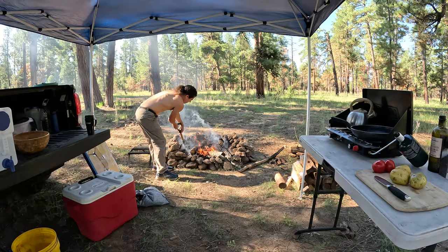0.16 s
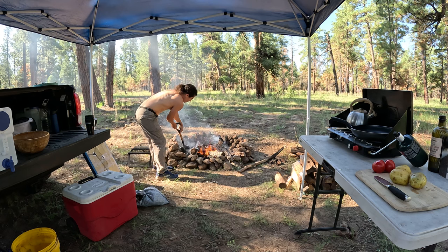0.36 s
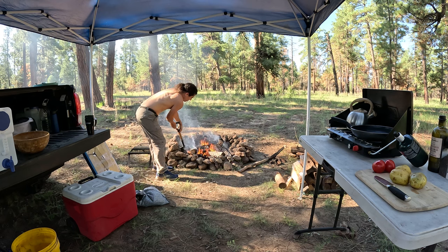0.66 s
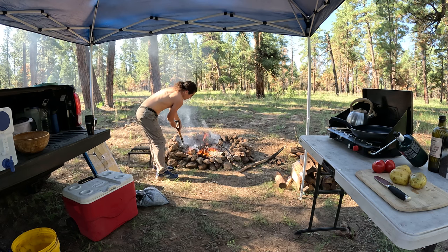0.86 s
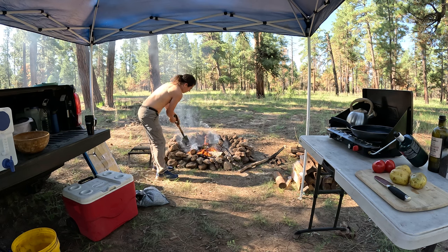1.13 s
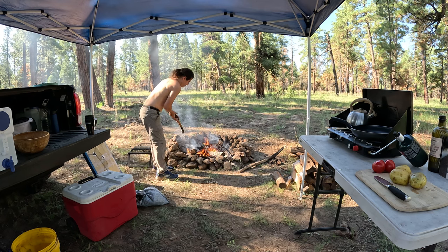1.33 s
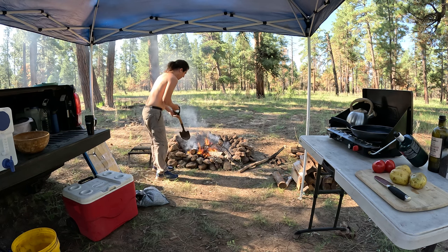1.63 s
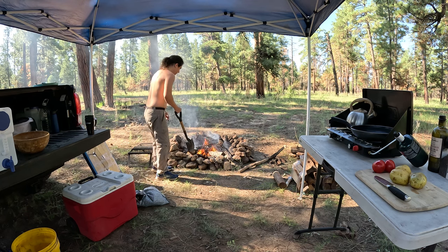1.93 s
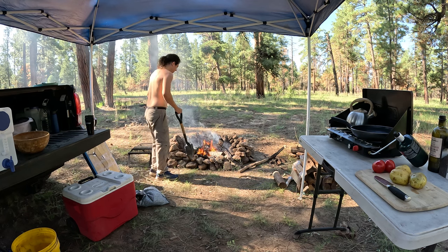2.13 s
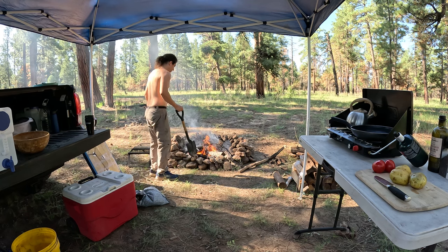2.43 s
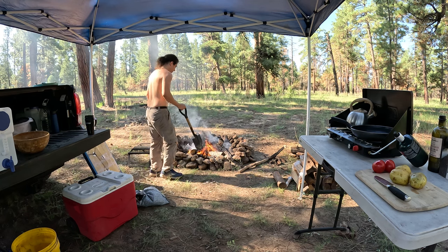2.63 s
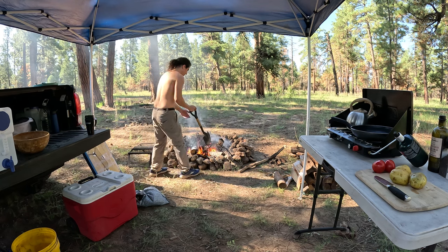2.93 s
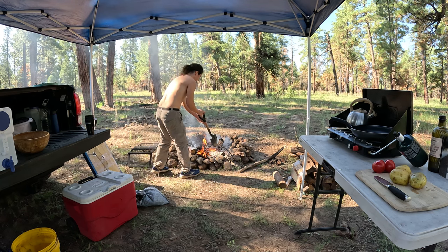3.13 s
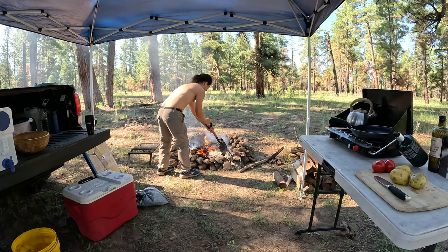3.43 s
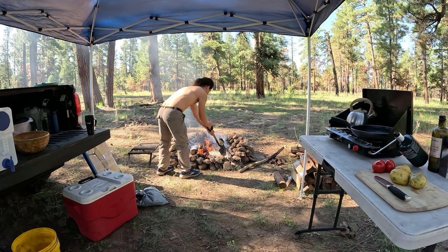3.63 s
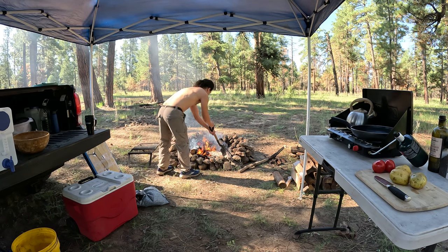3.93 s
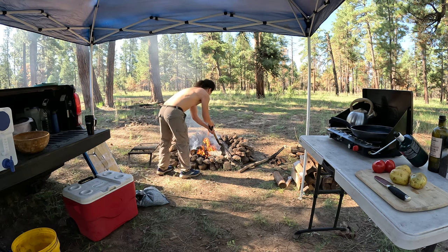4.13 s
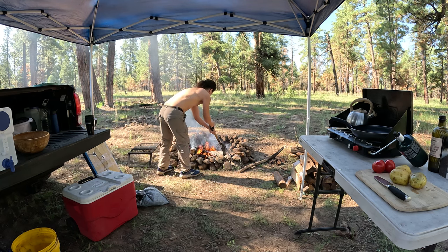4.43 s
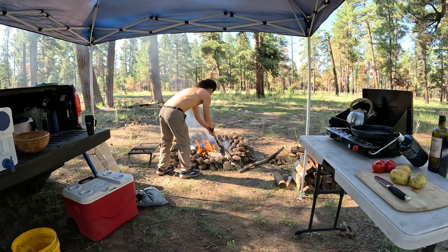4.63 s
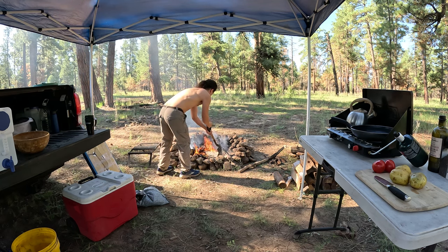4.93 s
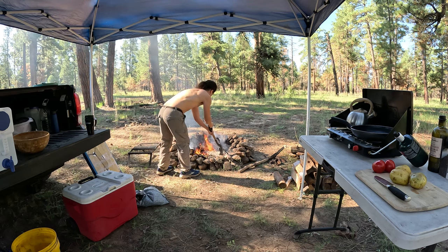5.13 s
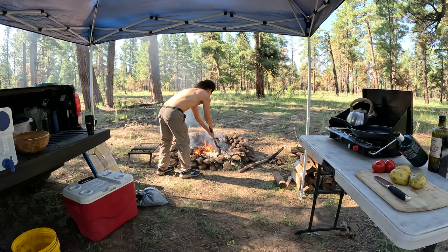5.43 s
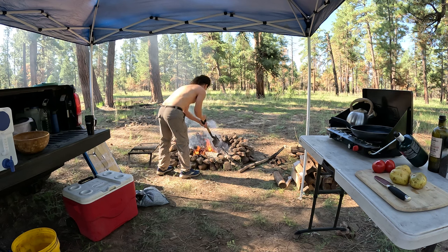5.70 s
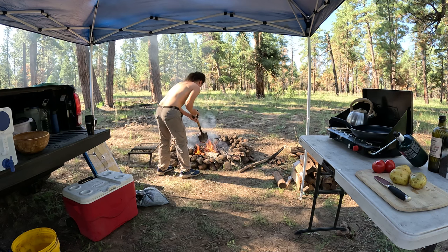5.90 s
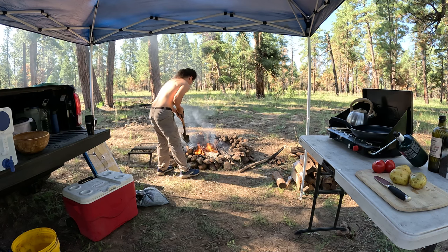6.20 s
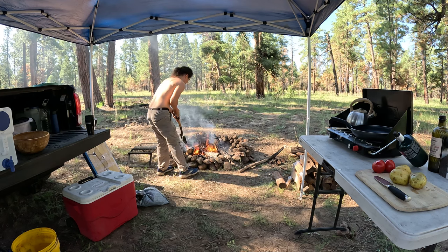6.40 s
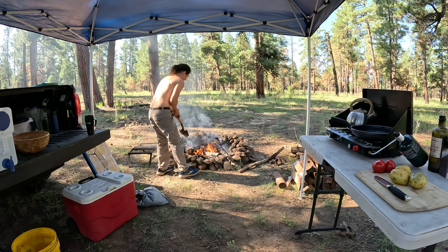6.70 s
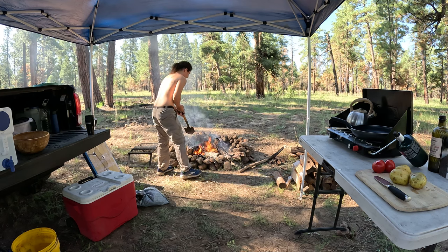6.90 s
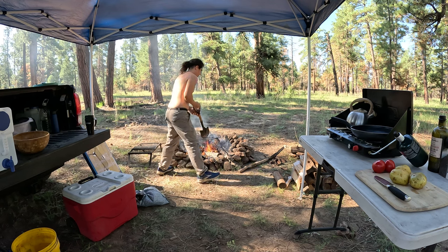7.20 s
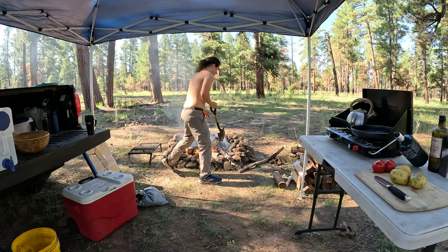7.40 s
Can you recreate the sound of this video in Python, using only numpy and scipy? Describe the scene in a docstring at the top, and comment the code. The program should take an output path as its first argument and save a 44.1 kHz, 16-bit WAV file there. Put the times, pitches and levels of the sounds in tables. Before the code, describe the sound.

A steel shovel works a wood fire outdoors. It opens with small ringing taps and a loud crunchy jab into coals, then the fire pops alone, one snap very sharp. Lighter knocks follow, then clanks, gritty scraping and a hard crunching strike, before crackles take over and a faint scrape ends it. Camera a few metres away under a canopy, quick echoes, soft forest hush.

```python
"""A wood fire pops and ticks near a small camera under a fabric canopy: each pop is an impulsive front with
a splintering tail, followed some 3 ms later by a strong echo. A steel shovel knocks, scrapes and rakes through
the coals: grains of noise make the crunch and decaying modes ring the blade, its early echoes far weaker.
A diffuse tail from the trees follows both, over fluttering flames and the hush of the forest, which are
noise shaped in frequency and time."""
import sys
import numpy as np
from scipy import signal
from scipy.io import wavfile
from scipy.ndimage import uniform_filter1d

SR = 44100
rng = np.random.default_rng(int(sys.argv[2]) if len(sys.argv) > 2 else 0)


def voltage_ratio(level):
    """Linear amplitude factor for a level in decibels (scalar or array-like)."""
    return 10 ** (np.asarray(level, float) / 20)


def put_to_file(sound):
    """Save the sound as 16-bit audio at rate SR, in the file named by the first command-line argument."""
    columns = np.atleast_2d(sound).T  # one column per channel
    safe = np.clip(columns, -1, 1)
    whole_steps = np.round(safe * 32767)
    wavfile.write(sys.argv[1], SR, whole_steps.astype(np.int16))


N = 332955  # length in samples


def evened(x):
    """Normalisation: scales a signal to rms 1."""
    return x / np.sqrt(np.mean(x ** 2) + 1e-20)


def read(points, hz):
    """Interpolation of a spectrum on a logarithmic frequency axis."""
    f, value = np.transpose(points)
    return np.interp(np.log(hz + 1), np.log(f + 1), value)


def add(mix, s, sound):
    """Superposition: adds a sound to the mix, in place, at s seconds."""
    part = mix[max(round(s * SR), 0):][:len(sound)]
    part += sound[:len(part)]


def colour(points, hz=None, octaves=1., reach_db=60, size=2048):
    """Minimum-phase response of a spectrum, optionally weighted towards a centre frequency."""
    f = np.fft.rfftfreq(size, 1 / SR)
    db = read(points, f)
    if hz:
        distance = np.log2((f + 1) / hz) / octaves  # the weighting is 6 dB down at distance 1
        db = db - np.minimum(6 * distance ** 2, reach_db)
    log_gain = np.log(voltage_ratio(np.maximum(db - db.max(), -80)))
    full = np.concatenate([log_gain, log_gain[-2:0:-1]])
    phase = -signal.hilbert(full).imag  # the phase that makes the response causal
    return np.fft.ifft(np.exp(full + 1j * phase)).real[:size // 2]


def slow(t, low_hz, high_hz):
    """Slow random modulation of rms 1: a sum of sines with random phases."""
    waves = [np.sin(2 * np.pi * (f * t + rng.random())) / np.sqrt(f)
             for f in np.geomspace(low_hz, high_hz, num=24)]
    return evened(sum(waves))


def clicks(per_s, spread_db):
    """Random impulse process: sparse clicks of random sign, a few of them large."""
    size = voltage_ratio(spread_db * np.minimum(rng.exponential(1, N), 5)) * rng.choice([-1., 1.], N)
    return size * (rng.random(N) < per_s / SR)


# spectrum of forest air and flames: f/Hz, relative level/dB
HUSH_SPECTRUM = [(18, -48), (30, -19.5), (86, -15.5), (181, -1.5), (470, -2), (562, 2), (941, -4.5),
                 (1190, -0.5), (2700, -4.5), (5690, -14.5), (7170, -18.5), (9040, -33.5), (10800, -23),
                 (12600, -34), (14000, -66)]


def hush():
    """Filtered noise: forest air and flames drift in patches, the bass fluttering in lumps."""
    frames, hz = N // 256 + 5, np.fft.rfftfreq(1024, 1 / SR)
    real, imaginary, patches = rng.standard_normal((frames, 513, 3)).T
    patches = uniform_filter1d(patches, size=10, axis=0)  # joined across frequency
    patches = evened(uniform_filter1d(patches, size=12, axis=1))  # and across time
    t = np.arange(frames) * 256 / SR
    flutter_db = 8 * np.tanh(.6 * slow(t, 4, 40)) / (1 + (hz[:, None] / 300) ** 2)
    drift_db = 2.0 * patches + 0.1 * slow(t, 0.31, 10.0)
    z = (real + 1j * imaginary) * voltage_ratio(read(HUSH_SPECTRUM, hz)[:, None] + drift_db + flutter_db)
    noise = signal.istft(z, nperseg=1024, noverlap=768)[1][:N]
    return voltage_ratio(-58) * evened(noise)


# decay of the tail scattered by the trees: f/Hz, t60/s
TREE_DECAY = [(200, 0.32), (1500, 0.19), (4000, 0.16), (10000, 0.12)]


def trees(x):
    """Diffuse scattering: sparse taps of random sign, each band dying at its own speed."""
    taps = np.zeros(SR // 2)
    at = np.arange(200, SR // 2 - 20, 20)
    taps[at + rng.integers(0, 20, len(at))] = rng.choice([-1., 1.], len(at))
    hz, t, z = signal.stft(taps, SR, nperseg=256)
    decay = voltage_ratio(-60 * t / read(TREE_DECAY, hz)[:, None])
    tail = signal.istft(z * decay, SR, nperseg=256)[1]
    return signal.oaconvolve(x, tail / np.linalg.norm(tail))[:N]


# early reflections: delay t/ms, level before the bass cut/dB
REFLECTIONS = [(2.7, 4), (3.5, -9), (6.3, -9), (9.5, -30), (14.5, -19), (24, -30)]


def echoes(x):
    """Early reflection: table, canopy and ground return echoes, roughness smearing the later ones more."""
    taps = np.zeros(2000)
    for (ms, db), noise in zip(REFLECTIONS, rng.standard_normal((len(REFLECTIONS), 150))):
        smear = noise * np.exp(-np.arange(150) / (SR / 1000 * 0.2 * ms))
        smear[0] += 6  # the firm front of the echo
        add(taps, ms / 1000, voltage_ratio(db) * smear / np.linalg.norm(smear))
    # small surfaces return little bass
    thin = signal.sosfilt(signal.butter(1, 1500, "high", fs=SR, output="sos"), taps)
    return signal.oaconvolve(x, thin)[:N]


# level of the faint ticking: t/s, level/dB
EMBER_LEVEL = [(0, -76), (1.2, -45), (2.2, -61), (3.5, -46), (5.6, -51), (6.2, -37), (6.7, -42),
               (7.55, -71)]
# a snap as the microphone colours it, shared by ticks and pops: f/Hz, relative level/dB
SNAP_SPECTRUM = [(59, -40), (100, -20), (275, -19.5), (1080, -17), (1700, -3.5), (4130, -9), (4490, -7),
                 (6100, -5), (7300, -9), (8340, -16), (10900, -5.5), (14000, -21.5)]


def ticks():
    """Random impulse process: faint ticking of embers, each click filtered as a snap."""
    s, db = np.transpose(EMBER_LEVEL)
    level = voltage_ratio(np.interp(np.arange(N) / SR, s, db))
    return signal.oaconvolve(level * clicks(45, 2.5), colour(SNAP_SPECTRUM, 7000, 0.8))[:N]


# from these moments on the blade rings with another balance of modes: t/s
BALANCE_START = [0, 1, 4.1, 5, 5.55]
# nominal ring time near 3 kHz in each balance: t60/s
BALANCE_RING_TIME = [.23, .13, .09, .14, .19]
# modes of the blade: f/Hz, then relative level/dB in each of the five balances
BLADE_MODES = [(517, -29, -16, -27, -13, -30), (1270, -22, -11, -3, -27, -27),
               (1320, -28, -5, -18, -26, -19), (1534, -20, -24, -24, -9, -16),
               (1755, -10, -13, -15, -9, -5), (1860, -12, -21, -23, -4, -8), (2137, -4, -21, -22, -17, -25),
               (2191, -24, -20, -7, -24, -24), (2266, -22, -5, -20, -5, -14), (2471, -10, -17, -19, -5, -4),
               (2638, -23, -4, -20, -15, -7), (2729, -4, -8, -2, -21, -17), (2885, -27, -8, -18, -13, -27),
               (3122, -28, -13, -24, 0, -22), (3192, -24, -22, -9, -22, -24),
               (3375, -25, -23, -14, -14, -5), (3515, -24, -8, -14, -5, -24), (3628, -5, -16, -23, -14, -6),
               (3775, -20, -20, -13, -12, -8), (3850, -24, -5, -24, -25, -28),
               (4479, -9, -12, -25, -24, -14), (4570, -20, -14, -23, -9, -8), (4651, 0, -7, -5, -23, -7),
               (5071, -10, -29, -18, -9, -14), (5346, -25, -10, -20, -26, -18),
               (5566, -26, -6, -14, -16, 0), (5830, -14, -18, -21, -8, -14),
               (6325, -24, -11, -24, -32, -25), (6438, -10, -4, -22, -21, -13),
               (6519, -34, -10, -19, -21, -33), (6880, -26, -37, -27, -33, -7),
               (6982, -35, -23, -25, -6, -34), (7246, -25, -11, -30, -9, -20),
               (7957, -16, -29, -17, -31, -26), (10400, -18, -30, -28, -30, -30),
               (11200, -23, -21, -25, -30, -30)]
FINE_MODES_HZ = 900 * 9 ** rng.random(50)  # the many faint modes between the strong ones


def blade(balance, hz=3000, octaves=9):
    """Modal vibration of the blade: damped sines, the coals damping the low, wide-swinging modes sooner."""
    t = np.arange(SR // 3) / SR
    strong = np.transpose(BLADE_MODES)
    f = np.append(strong[0], FINE_MODES_HZ)[:, None]
    spot_luck, decay_luck = rng.standard_normal((len(f), 2)).T[:, :, None]
    fine_db = np.full(len(FINE_MODES_HZ), -26)
    # each blow lands elsewhere and weights the modes anew
    mode_db = np.append(strong[balance + 1], fine_db)[:, None] + 1.5 * spot_luck
    t60 = BALANCE_RING_TIME[balance] * (f / 3000) ** .2 * 1.12 ** decay_luck
    t60 = t60 / (1 + (f / 10000) ** 4)  # the highest die in the air
    db = mode_db - 6 * (np.log2(f / hz) / max(octaves, .12)) ** 2
    return (voltage_ratio(db - 60 * t / t60) * np.sin(2 * np.pi * f * t)).sum(0)


# dragging through coals: t/s, gritty scrape level/dB, dull log shifting level/dB
RAKE_LEVELS = [(0.0, -60, -56), (0.05, -50.5, -77), (0.16, -53, -63), (0.2, -48.5, -68), (0.33, -56, -63),
               (0.42, -46, -62), (0.53, -41.5, -55), (0.6, -52, -64), (0.88, -66, -67), (1.32, -79, -66.5),
               (2.1, -59.5, -61.5), (2.44, -64, -66.5), (2.68, -73, -85), (2.82, -59.5, -69),
               (3.55, -63, -64.5), (4.3, -54.5, -64.5), (4.9, -47.5, -60), (5.02, -47.5, -55.5),
               (5.3, -50, -61.5), (5.53, -45.5, -68.5), (5.72, -66, -66.5), (6.9, -67.5, -67),
               (7.55, -57.5, -70.5)]
# how freely grit rings the blade in each balance: relative level/dB
BALANCE_RING_LEVEL = [2.5, -3.5, -0.5, 1, 3]
# centre frequencies of the grains from coarse to fine: f/Hz
GRAIN_CENTRES = [1150, 1800, 2400, 3300, 4500, 5670]
# spectrum of grit, shared by rake and knocks: f/Hz, relative level/dB
GRIT_SPECTRUM = [(82, -49), (140, 5), (183, -2), (571, -8.5), (943, -13), (1330, -6), (1530, -4),
                 (3630, -3), (6470, -9), (8980, -20.5), (10700, -9.5), (14000, -25.5)]
# spectrum of shifting logs: f/Hz, relative level/dB
SHIFT_SPECTRUM = [(59, -56.5), (100, -9), (194, 7.5), (314, -7), (376, 4), (1100, -18.5), (1430, -36.5),
                  (2420, -120)]


def rake():
    """Granular friction: dense grit under the blade rings the steel, beside dull knocks of shifting logs."""
    s, scrape_db, shift_db = np.transpose(RAKE_LEVELS)
    t = np.arange(N) / SR
    lumps = voltage_ratio(2.1 * np.interp(t, t[::128], slow(t[::128], 8, 80)))
    grit = [clicks(450, 2.9) * lumps for hz in GRAIN_CENTRES]
    all_grit = sum(grit)
    current = np.searchsorted(BALANCE_START, t, "right") - 1
    steel = np.zeros(N)
    for balance, ring_db in enumerate(BALANCE_RING_LEVEL):
        drive = all_grit * (current == balance) * voltage_ratio(ring_db)
        steel += signal.oaconvolve(drive, evened(blade(balance)))[:N]
    crunch = sum(signal.oaconvolve(grains, colour(GRIT_SPECTRUM, hz, 1.4))[:N]
                 for grains, hz in zip(grit, GRAIN_CENTRES))
    scrape = evened(evened(crunch) + .33 * evened(steel))
    logs = evened(signal.oaconvolve(clicks(300, 1.4) * lumps, colour(SHIFT_SPECTRUM))[:N])
    return voltage_ratio(np.interp(t, s, scrape_db)) * scrape + voltage_ratio(np.interp(t, s, shift_db)) * logs


def knock(peak_db, hz, octaves, t60, noise):
    """Granular crushing: a cluster of uneven charcoal grains swells fast and dies."""
    t = np.arange(len(noise)) / SR
    swell = np.minimum(t / (.11 * t60), 1)
    grains = noise * abs(noise) ** 1.4 * voltage_ratio(-60 * t / max(t60, .01)) * swell
    grains[round(.002 * SR)] += 5  # the first firm contact
    sound = signal.fftconvolve(grains, colour(GRIT_SPECTRUM, hz, max(octaves, .1)))
    return voltage_ratio(peak_db) * sound / abs(sound).max()


# coals, logs and dirt knock, crunch and thud: t/s, peak level/dB, centre f/Hz, width/octaves, t60/s
COAL_KNOCKS = [(0.1054, -24, 1706, 0.16, 0.014), (0.401, -44, 238, 0.48, 0.044),
               (0.447, -16.5, 2800, 1.54, 0.055), (0.4581, -15.5, 2700, 1.1, 0.03),
               (0.471, -23, 2600, 1.7, 0.057), (0.491, -20, 1990, 3.2, 0.04), (0.51, -35, 4700, 0.18, 0.05),
               (0.508, -28.5, 2080, 0.31, 0.039), (0.531, -29, 2540, 1.6, 0.044),
               (0.552, -21, 2580, 1.55, 0.052), (0.694, -34, 2400, 1.7, 0.041),
               (0.703, -49.5, 272, 1, 0.049), (2.224, -39, 685, 1.4, 0.064),
               (2.363, -38.5, 187, 1.6, 0.038), (2.836, -35.5, 1740, 0.61, 0.07),
               (2.854, -38, 4500, 0.8, 0.035), (2.865, -34.5, 1900, 0.3, 0.042),
               (2.881, -38, 4000, 0.7, .03), (2.903, -38, 4000, 0.54, 0.014),
               (2.879, -35.5, 1230, 1.2, 0.22), (2.901, -44, 1920, 0.33, 0.088),
               (2.974, -35, 760, 0.5, .05), (2.94, -41, 1400, 0.64, 0.18), (2.925, -39, 890, 0.73, 0.24),
               (3.205, -39.5, 192, 2, 0.02), (3.306, -40, 205, 2.2, 0.038),
               (3.366, -39.5, 1220, 1.2, 0.087), (3.402, -27.5, 1850, 1.12, 0.053),
               (3.464, -37, 1590, 0.61, 0.11), (3.842, -37, 1500, 2.3, 0.099),
               (3.877, -48, 4200, 0.33, 0.028), (3.996, -34, 2400, 5.4, 0.038),
               (4.317, -33, 3700, 8.6, 0.28), (4.436, -35.5, 2400, 0.4, 0.019),
               (4.479, -32, 3260, 1.2, 0.13), (4.511, -37.5, 2650, 0.48, 0.093),
               (4.717, -31.5, 3150, 1.5, 0.085), (4.789, -32.5, 3880, 1.1, 0.02),
               (4.803, -36, 3970, 1.1, 0.052), (4.837, -30, 3930, 1, 0.028), (4.849, -26, 3460, 3.6, 0.059),
               (4.884, -31.5, 3050, 1.1, 0.037), (4.914, -34.5, 3460, 1, 0.1),
               (5.018, -26.5, 3000, 2.3, 0.14), (5.031, -31.5, 2600, 2.4, 0.053),
               (5.058, -36, 3000, 2.4, 0.27), (5.029, -42, 453, 1.13, 0.22),
               (5.211, -46, 2500, 0.99, 0.029), (5.222, -30.5, 2720, 0.43, 0.028),
               (5.403, -39, 433, 0.49, 0.033), (5.428, -43, 625, 0.23, 0.059),
               (5.436, -17.5, 3300, 1.9, 0.096), (5.458, -38.5, 580, 0.36, 0.12),
               (5.468, -12.5, 2860, 1.2, 0.044), (5.483, -33, 576, 0.51, 0.015),
               (5.484, -24.5, 2600, 2.8, 0.049), (5.917, -36.5, 3300, 0.29, 0.014),
               (7.005, -40.5, 1950, 0.81, 0.039), (7.027, -43.5, 2160, 0.85, 0.05),
               (7.315, -37, 2100, 1.07, 0.28), (7.351, -34.5, 890, 0.74, 0.19), (7.369, -36, 1190, 7, 0.13),
               (7.427, -36, 1030, 1.64, 0.21), (7.46, -36, 2600, 1.7, 0.11)]


def add_knocks(shovel):
    """Superposition of the knocks in coals, logs and dirt."""
    for (s, *row), noise in zip(COAL_KNOCKS, rng.standard_normal((len(COAL_KNOCKS), 6000))):
        add(shovel, s, knock(*row, noise))


def clank(s, peak_db, hz, octaves, t60, noise):
    """Impact excitation: a blow and its weaker rattles ring the steel, over a little crunch of what it hit."""
    t = np.arange(len(noise)) / SR
    contact = .008 * noise[::-1] ** 3 * voltage_ratio(-60 * t / max(t60, .01))
    contact[0] += 1
    balance = np.searchsorted(BALANCE_START, s) - 1
    sound = signal.fftconvolve(contact, blade(balance, hz, octaves))
    sound *= np.minimum(np.arange(len(sound)) / SR / 0.0015, 1)  # the edge takes 1.5 ms to bite
    sound *= voltage_ratio(peak_db) / abs(sound).max()
    add(sound, 0, knock(peak_db - 11, hz, 2.5, t60, noise))
    return sound


# the blade strikes something hard:
# t/s, peak level of the ring/dB, centre f/Hz of the modes it favours, width/octaves, rattle t60/s
BLADE_BLOWS = [(0.015, -37, 4270, 0.79, 0.03), (0.0514, -41.5, 2200, 0.32, 0.17),
               (0.1046, -31.5, 1780, 0.43, 0.13), (0.1732, -43, 6800, 0.69, 0.061),
               (0.2, -43, 4200, 0.66, 0.04), (0.2391, -51, 3600, 0.18, 0.053),
               (0.265, -50, 2400, 0.11, 0.087), (0.551, -46, 2800, 0.15, 0.049),
               (3.629, -33.5, 2260, 1.6, 0.15), (3.6498, -38.5, 2260, 0.93, 0.34),
               (3.933, -39.5, 5800, 1.1, 0.17), (3.9531, -33, 1800, 1.6, 0.04),
               (4.011, -43, 8000, 1.8, 0.088), (4.206, -32, 2920, 4.3, 0.052),
               (4.214, -27.5, 2400, 9.9, 0.073), (4.3686, -29, 2530, 1.5, 0.026),
               (5.397, -31.5, 3150, 1.3, 0.63), (5.438, -21.5, 2980, 1.5, 0.02),
               (5.4269, -23, 2600, 1.2, 0.032), (5.47, -19, 3020, 1, 0.034), (5.574, -43, 5530, 0.66, 0.26),
               (5.592, -37, 2450, 1.2, 0.056)]


def add_clanks(shovel):
    """Superposition of the blows on the blade."""
    for row, noise in zip(BLADE_BLOWS, rng.standard_normal((len(BLADE_BLOWS), 6000))):
        add(shovel, row[0], clank(*row, noise))


def pop(peak_db, hz, noise):
    """Impulsive release: a pocket of gas bursts with one sharp front, then splintering."""
    t = np.arange(len(noise)) / SR
    burst = voltage_ratio(-23) * noise * np.exp(-t / 0.0026)
    burst[0] += 1
    sound = np.convolve(burst, colour(SNAP_SPECTRUM, hz, 1.23, reach_db=14))
    return voltage_ratio(peak_db) * sound / abs(sound).max()


# bursting wood: t/s, peak level sent to the echoes/dB, centre f/Hz,
# first arrival before shading against that level/dB
WOOD_POPS = [(0.3408, -16, 4600, 4), (0.774, -41, 6230, 8), (0.785, -34, 3460, 6.5),
             (1.024, -42.5, 6080, 1), (1.049, -36, 6730, -3), (1.123, -48, 6720, 5),
             (1.1735, -49, 8540, -3), (1.306, -48, 4500, 4), (1.3494, -47, 5710, 5), (1.441, -49, 6140, -9),
             (1.479, -43, 6700, 12.5), (1.562, -49, 2980, 14.5), (1.9467, -27.5, 5130, 3),
             (2.037, -45, 3200, 5), (2.1502, -45, 3960, -3), (2.365, -8, 5560, 2.5), (2.5819, -28, 5170, 1),
             (2.65, -36, 2270, 4), (2.8181, -29.5, 5800, 7.5), (2.9749, -30.5, 2000, 5.5),
             (3.206, -19.5, 3370, -3), (3.2705, -42, 4080, 15), (3.326, -52, 10500, -1),
             (3.343, -50, 6890, 12), (3.511, -37, 7000, 7), (3.753, -49, 2660, 19.5),
             (3.817, -38.5, 3380, 4), (3.998, -33.5, 9500, -6), (4.11, -30.5, 6440, 2),
             (4.139, -44, 4500, 12), (4.303, -44, 8000, 9), (4.3499, -17.5, 4650, 0),
             (4.5796, -36.5, 4100, 3), (4.679, -45, 4500, 19), (5.6588, -31.5, 2560, 9.5),
             (5.804, -47, 6460, 11), (5.8688, -28, 3150, -1), (5.978, -40, 3610, -2),
             (6.0387, -37, 2950, -8), (6.076, -36, 2930, -7), (6.1346, -44, 5000, -7),
             (6.156, -41, 4500, -8), (6.194, -40.5, 6670, -11), (6.2436, -39, 5710, -5),
             (6.263, -37, 3500, -3), (6.363, -16.5, 3800, -2), (6.4307, -35, 4830, -8),
             (6.452, -38, 2470, -4), (6.6837, -24.5, 5400, 1), (6.7427, -39, 3400, 2),
             (6.8809, -28.5, 3860, -5), (6.937, -38, 3100, -2), (7.1493, -39, 4340, 7.5),
             (7.246, -48, 4350, 16), (7.445, -32, 4120, -3)]


def fire():
    """Superposition of ticks and pops: the sound sent to the reflections, and the shaded direct path."""
    source = ticks()
    direct = source.copy()
    for (s, db, hz, first_db), noise in zip(WOOD_POPS, rng.standard_normal((len(WOOD_POPS), 400))):
        sound = pop(db, hz, noise)
        add(source, s, sound)
        add(direct, s, voltage_ratio(first_db) * sound)
    # the stones round the fire shade the treble of the direct path
    shade = signal.butter(1, 6500, fs=SR, output="sos")
    return source, signal.sosfilt(shade, direct)


def scene():
    """Superposition of fire, shovel, their reflections and the background, equal in both channels."""
    burning, direct = fire()
    shovel = rake()
    add_knocks(shovel)
    add_clanks(shovel)
    near = direct + echoes(burning) + shovel + voltage_ratio(-24.0) * echoes(shovel)
    near = near + voltage_ratio(-9.5) * trees(burning + shovel)
    # the high-pass removes offset and rumble left by the summed sines
    mid = signal.sosfilt(signal.butter(2, 130, "high", fs=SR, output="sos"), near) + hush()
    return np.array([mid, mid])


def low_pass(x):
    """Removes everything above the highest recorded frequency."""
    return signal.sosfilt(signal.butter(12, 14140, fs=SR, output="sos"), x)


# a noisy side signal, strongest in the treble: f/Hz, side level against mid/dB
SIDE_LEVEL = [(60, -26), (250, -35), (600, -30.5), (1200, -30.5), (2200, -46), (4000, -29), (6500, -23),
              (9000, -16), (10800, -16.5), (11400, -8), (12800, -0.5), (14000, -14)]


def record(dry):
    """Mid/side stereo: the camera body notches 9 kHz; a noisy side signal is strongest in the treble."""
    mid = signal.lfilter(*signal.iirnotch(9050, 18, SR), dry[0])
    mid = signal.sosfilt(signal.butter(8, 13100, fs=SR, output="sos"), mid)  # steep low-pass near 13 kHz
    hz, t, z = signal.stft(mid, SR, nperseg=512)
    # random phases decorrelate the side from the mid
    turn = np.exp(2j * np.pi * uniform_filter1d(rng.standard_normal(z.shape), size=3, axis=0))
    side = signal.istft(z * turn * voltage_ratio(read(SIDE_LEVEL, hz))[:, None], SR, nperseg=512)[1][:N]
    return low_pass(np.array([mid + side, mid - side]))


dry = scene()
out = record(dry)
put_to_file(out)
```